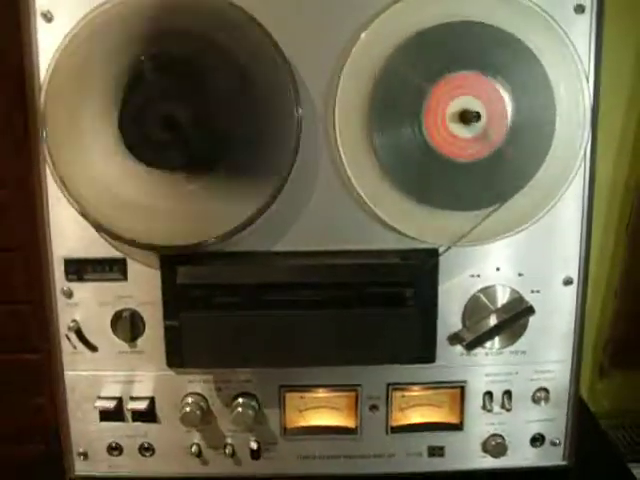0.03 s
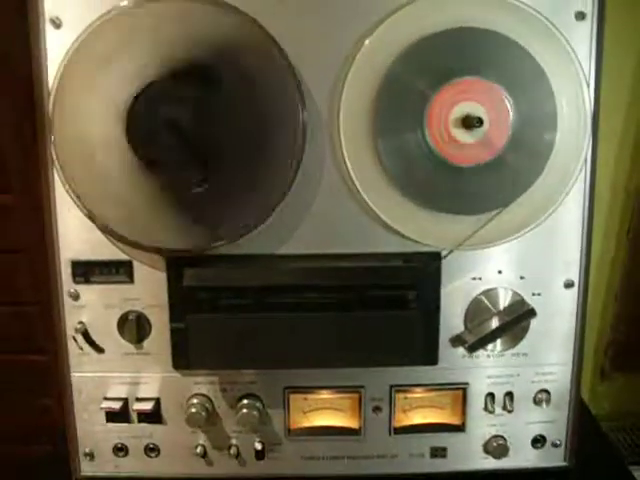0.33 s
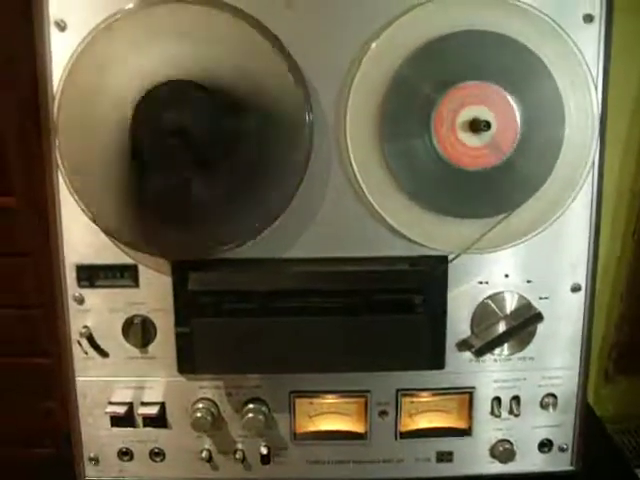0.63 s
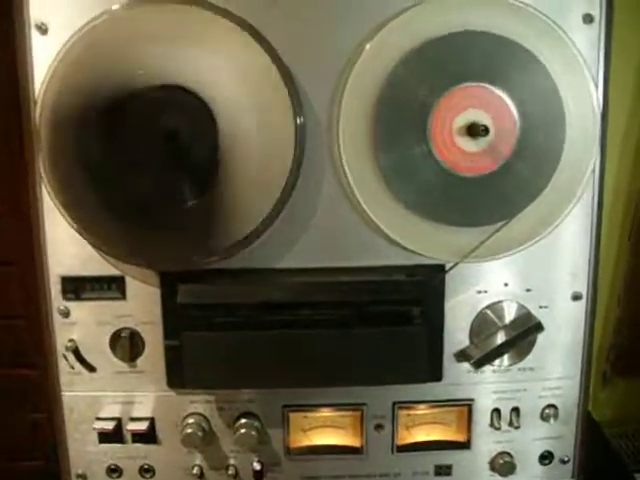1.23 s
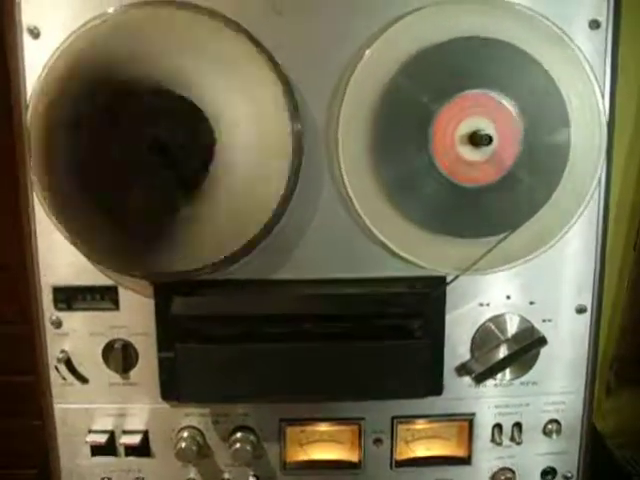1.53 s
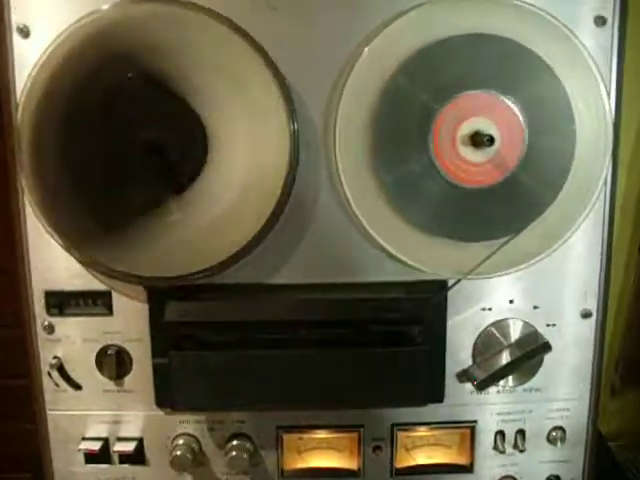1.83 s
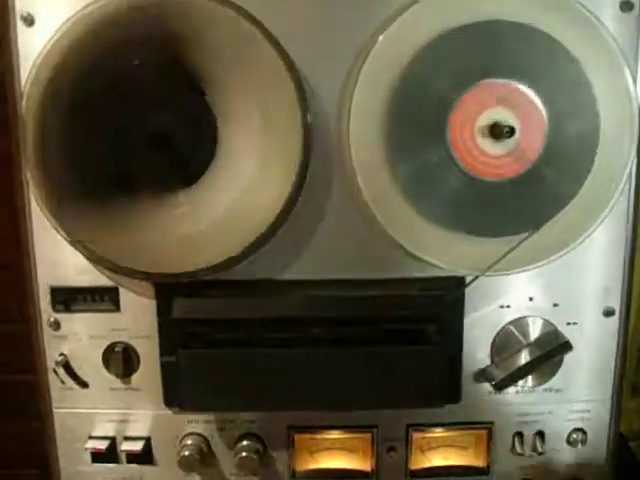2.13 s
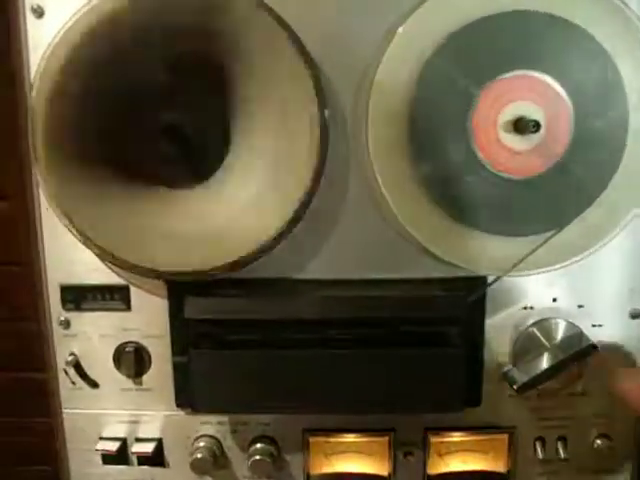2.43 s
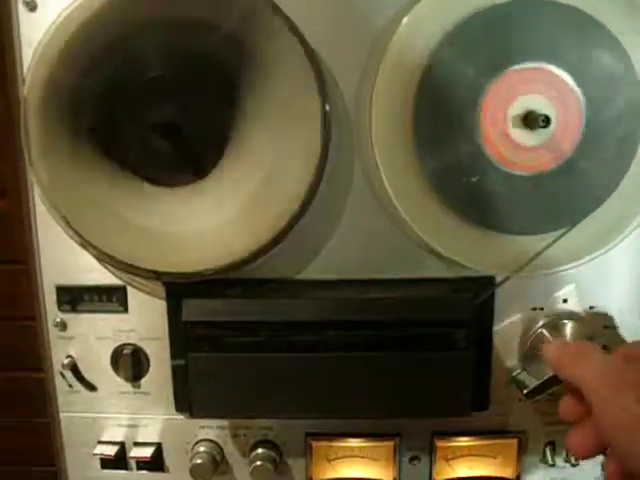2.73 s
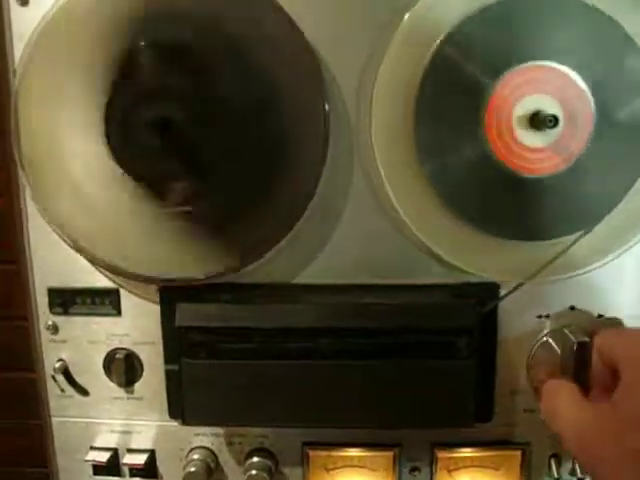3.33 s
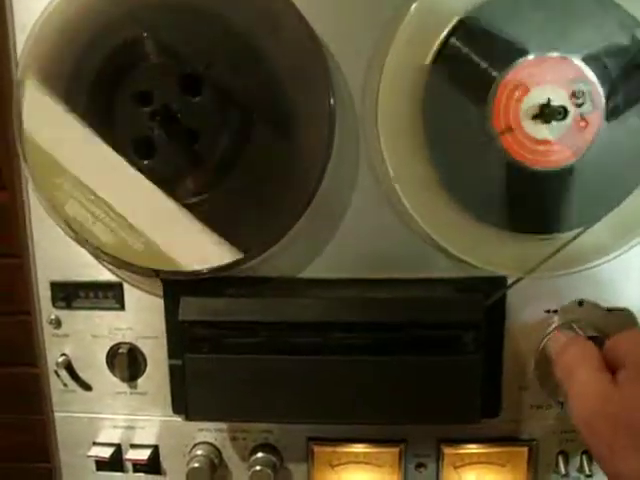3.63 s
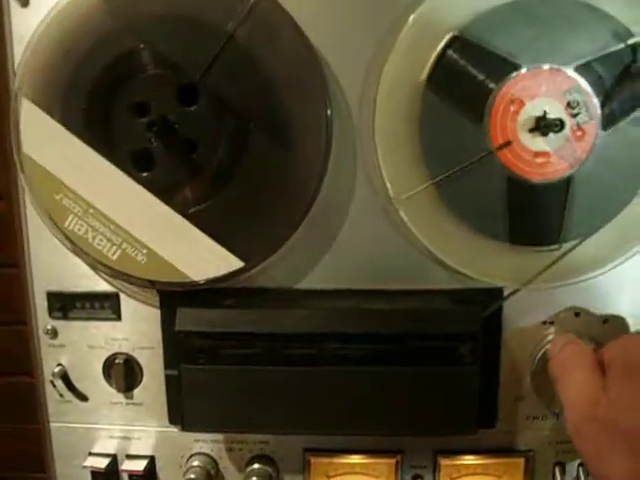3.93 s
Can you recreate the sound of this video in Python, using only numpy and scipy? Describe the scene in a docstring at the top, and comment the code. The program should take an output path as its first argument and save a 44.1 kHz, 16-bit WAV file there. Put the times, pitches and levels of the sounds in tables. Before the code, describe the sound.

A tape machine whirs and hisses indoors, its spinning reels ticking softly and the tape brushing a rim. Then levers and brakes slam over in a sharp metallic clunk, briefly overloading the microphone, and the reels run down.

```python
"""A small room, where a reel-to-reel tape machine winds fast: motors whir, tape hisses and brushes a
reel's flange, and a turning part knocks softly on every turn. A hand turns the transport knob: levers
and brakes slam over in one rattling clunk that rings the deck's panels, thuds through the cabinet
and overloads the microphone. The latch snaps home, and the motor tones fade as the reels run down."""
import sys
import numpy as np
from scipy import signal
from scipy.io import wavfile

SR = 44100
rng = np.random.default_rng(int(sys.argv[2]) if len(sys.argv) > 2 else 0)


def wrap_up_sound(samples):
    """Save the sound to the file named by the first command line argument, as 16-bit audio."""
    columns = np.atleast_2d(samples).T
    # keep every value between -1 and 1, then stretch to whole-number steps
    tamed = np.clip(columns, -1, 1)
    steps = np.round(tamed * 32767).astype(np.int16)
    wavfile.write(sys.argv[1], SR, steps)


N = 176400
T = np.arange(N) / SR


def from_db(db):
    """Decibels to gain."""
    return 10 ** (np.asarray(db) / 20)


def rms_one(x):
    """Scale to unit rms."""
    return x / np.sqrt(np.mean(x ** 2) + 1e-20)


def at_hz(points, hz):
    """Read a table on a log-frequency axis."""
    freqs, values = np.transpose(points)
    return np.interp(np.log(hz), np.log(freqs), values)


def clicks(times, gains):
    """One impulse at each time."""
    return np.bincount(np.clip(times * SR, 0, N - 1).astype(int), gains, N) + 1e-18


def ring(x, hz, t60):
    """A resonance: a unit click sets off a dying sine of height 1."""
    radius, angle = from_db(-60 / (t60 * SR)), 2 * np.pi * hz / SR
    return signal.lfilter([.5, 0, -.5], [1, -2 * radius * np.cos(angle), radius * radius], x)


def struck(x, hz, t60, swell_s):
    """A mode that takes a moment to ring up."""
    return ring(x, hz, t60) - ring(x, hz, swell_s * np.log(1000))


def dying(power, attack_s, t60):
    """Power envelope that rises and dies away after each impulse."""
    decay, attack = 10 ** (-6 / (t60 * SR)), np.exp(-1 / (attack_s * SR))
    tails = signal.lfilter([1], [1, -decay], power)
    return signal.lfilter([1 - attack], [1, -attack], tails)


def noise_bands(spectrum):
    """Third-octave noises as (centre in Hz, signal), their powers adding up to 1."""
    edges = 20 * 2 ** (np.arange(28) / 3)
    centres = np.sqrt(edges[1:] * edges[:-1])
    white = rng.standard_normal((3, N))
    gains = from_db(at_hz(spectrum, centres)) * np.sqrt(np.diff(edges))
    for k, gain in enumerate(gains / np.linalg.norm(gains)):
        sos = signal.butter(2, edges[k:k + 2], "band", fs=SR, output="sos")
        yield centres[k], gain * rms_one(signal.sosfilt(sos, white[k % len(white)]))


def drift(count):
    """A slow wander through count random points, spread about 1."""
    return np.interp(T, np.linspace(0, T[-1], count), rng.standard_normal(count))


def low_pass(x, hz):
    """Steep low-pass."""
    return signal.sosfilt(signal.ellip(12, .1, 90, hz, fs=SR, output="sos"), x)


def whir(level_db=-45, flicker_db=0.66):
    """A bed of air noise and tape hiss, each band flickering slightly on its own."""
    # colour of the bed: f/Hz, relative density/dB
    spectrum = [(25, 1.5), (90, 1.5), (165, -2), (240, 0.5), (360, 0.5), (590, 1.5), (715, -2), (870, 0.5),
                (1350, -4), (1800, -4), (2600, -7), (4500, -9), (7200, -10.5), (9000, -19.5)]
    # fader ride on the bed: t/s, gain/dB
    ride = [(0, -0.62), (3.15, 0), (3.6, -0.5), (4, -1.5)]
    air = sum(band * from_db(flicker_db * drift(count=90)) for _, band in noise_bands(spectrum))
    return air * from_db(level_db + np.interp(T, *np.transpose(ride)))


def motors(brake_s=3.4, run_down_s=1):
    """Wavering motor tones, made of narrow noise, that fade once the brakes are on."""
    # motor tones while winding: f/Hz, width/Hz, level/dB
    tones = [(205, 7, -63), (229, 20, -60.5), (265.8, 7, -58), (298.4, 5.8, -62.5), (446.4, 5, -60),
             (838.5, 12, -67.5)]
    hum = 0
    for hz, width, db in tones:
        t60 = np.log(1000) / (np.pi * width)
        hum += from_db(db) * rms_one(ring(rng.standard_normal(N), hz, t60))
    return hum * np.exp(-np.maximum(T - brake_s, 0) / run_down_s)


def tape_brushes(width_s=0.0049, band_hz=(710, 6000)):
    """Short swishes of tape against the reel's flange, with a faint ring in them."""
    # the tape touches the flange: t/s, level/dB
    touches = [(1.095, -48), (1.71, -48), (2.01, -52), (2.425, -51), (2.527, -47), (2.627, -49.5),
               (2.729, -49), (2.833, -46), (2.928, -46.5), (3.025, -47.5), (3.125, -48)]
    band = signal.butter(1, band_hz, "band", fs=SR, output="sos")
    hiss = signal.sosfilt(band, rng.standard_normal(N))
    ringing = from_db(-24) * ring(hiss, hz=3500, t60=0.0094)
    swells = sum(from_db(db) * np.exp(-.5 * ((T - s) / width_s) ** 2) for s, db in touches)
    return rms_one(hiss + ringing) * swells


def knocks(trim_db=-2, spread_db=3, swell_s=0.00159, jitter_s=0.00053, echo_s=0.011, echo_db=-12.5):
    """A turning part rings up the cabinet: a soft knock and its reflection each turn, until the clunk."""
    # one knock a turn: t/s, relative level/dB
    turns = [(0.009, -39.5), (0.104, -40), (0.197, -42), (0.292, -38), (0.386, -42), (0.481, -37),
             (0.574, -37), (0.667, -45), (0.762, -41), (0.859, -36), (0.951, -36.5), (1.044, -38),
             (1.14, -36), (1.233, -34.5), (1.326, -41), (1.421, -42), (1.515, -39), (1.608, -38.5),
             (1.702, -39.5), (1.796, -38), (1.891, -36), (1.984, -43), (2.079, -36.5), (2.172, -41),
             (2.267, -39), (2.361, -39.5), (2.454, -40), (2.55, -38), (2.643, -38), (2.736, -43),
             (2.831, -35.5), (2.926, -39), (3.021, -36.5), (3.114, -41)]
    # the knock's hollow body: f/Hz, gain/dB, t60/s
    modes = [(855, -1, 0.06), (1000, 1.5, 0.04), (1129, -1.5, 0.046), (1780, -12.5, .04)]
    times, turn_db = np.transpose(turns)
    out = 0
    for hz, mode_db, t60 in modes:
        gains = from_db(turn_db + trim_db + mode_db + spread_db * rng.standard_normal(len(times)))
        onsets = times - swell_s + rng.normal(0, jitter_s, len(times))
        taps = clicks(onsets, gains) + clicks(onsets + echo_s, gains * from_db(echo_db))
        out += struck(taps, hz, t60, swell_s)
    return out


def brake_thud(at_s=3.23, level_db=-21):
    """The brake's blow, the heaviest of the clunk, shakes the cabinet."""
    return ring(clicks(np.array([at_s]), from_db([level_db])), hz=149, t60=0.1)


def linkage_rattle(times, blow_db, treble_db, bass_db):
    """Each blow rattles the linkage: a burst of noise that dies away in the room."""
    # colour of a blow: f/Hz, relative density/dB
    spectrum = [(30, -36), (100, -23), (160, -20), (300, -19), (430, -2.5), (550, -2.5), (900, 0.5),
                (1600, -6.5), (2300, -6.5), (4500, -12.5), (6300, -8), (8000, -14.5)]
    # the room's decay: f/Hz, t60/s
    room_decay = [(100, 0.63), (500, 0.48), (1250, 0.3837), (2500, 0.65), (7000, 0.17)]
    # the room's reverb send: f/Hz, gain/dB
    room_send = [(100, -15), (250, -5.5), (800, -19), (1300, -9.5), (2500, -20), (7000, -17.5)]
    out = 0
    for hz, band in noise_bands(spectrum):
        octaves = np.log2(hz / 1000)
        tilt_db = treble_db * np.clip(octaves / 2, 0, 1) + bass_db * np.clip(-octaves, 0, 1)
        power = clicks(times, from_db(blow_db + tilt_db) ** 2)
        stretch = 2 ** (-0.29 * octaves)  # lower bands ring longer
        direct = dying(power, attack_s=0.0012 * stretch, t60=0.067 * stretch)
        room = dying(power, attack_s=0.015, t60=at_hz(room_decay, hz))
        send = from_db(at_hz(room_send, hz))
        out += band * np.sqrt(direct + room * send ** 2)
    return out


def clunk():
    """Levers, brakes and latch strike the deck: each blow rattles and sets the metal ringing."""
    # blows on the deck: t/s, relative level/dB, treble/dB, bass/dB, latch ring/dB
    blows = [(3.1881, -22.5, 5, 8, -20), (3.1921, -15, 7.5, 1.5, -23), (3.202, -11, 0.5, 0.5, -8),
             (3.2071, -14.5, 2, -1, 3), (3.2144, -17, -9, -3, 3), (3.2189, -17.5, -1.5, -16, 4),
             (3.2268, -6.5, 1.5, -12, -8), (3.23, 0.5, -6.5, -10, -16), (3.2352, -4, 2.5, 2.5, -12),
             (3.246, -18, 4.5, 1, -6), (3.2566, -15, -2, -7, 1.5), (3.2738, -9, 2, 4, -8),
             (3.28, -15.5, 3, 0, 2), (3.2958, -15, 2.5, 0, 7), (3.3313, -26.5, 9.5, 12, -17),
             (3.3637, -13.5, 4, 1, 8.5), (3.487, -32, -2.5, -5, -8), (3.506, -38, 1.5, 2, 6),
             (3.702, -39.5, -5, -5, -5), (3.986, -39.5, -2, 5, -4)]
    # long ring of the deck's panels: f/Hz, gain/dB, t60/s
    panel_modes = [(222.7, -31.5, 0.58), (253.7, -31, 0.36), (281.5, -33.5, 0.35), (462, -23.5, .42),
                   (674, -24, 0.26), (755, -24, 0.25), (860, -22, 0.24), (918, -21, 0.22),
                   (1005, -26, 0.19), (1180, -29, 0.59), (1240, -23, .5), (1242, -25, 0.67),
                   (1392, -26, .55), (1490, -27.5, 0.4), (1500, -23, 0.33), (1597, -20.5, 0.24),
                   (1765, -16, 0.2), (1809, -23, 0.26), (2514, -35.5, 0.93), (2665, -29, 0.63)]
    # short snap of the latch: f/Hz, gain/dB, t60/s
    latch_modes = [(1258, -2.5, 0.034), (1363, 3.5, 0.03), (1536, -3.5, 0.041)]
    times, blow_db, treble_db, bass_db, latch_db = np.transpose(blows)
    out = linkage_rattle(times, blow_db, treble_db, bass_db)
    for modes, strength_db in ((panel_modes, blow_db), (latch_modes, blow_db + latch_db)):
        for hz, mode_db, t60 in modes:
            hits = clicks(times, from_db(strength_db + mode_db))
            out += struck(hits, hz, t60, swell_s=0.00064)
    return out


def scene():
    """The winding machine and the clunk that stops it, in mono."""
    return (whir() + motors() + knocks() + tape_brushes() + brake_thud() + clunk())[None]


def record(dry):
    """A narrow-band microphone that overloads on the clunk; the top is cut."""
    band_hz, leak_db, top_hz, cutoff_hz = 7670, -12, 8700, 15850
    ceiling, knee = 0.72, 8
    narrow = low_pass(dry, band_hz)
    skirt = signal.sosfilt(signal.butter(8, band_hz, "high", fs=SR, output="sos"), dry)
    mic = low_pass(narrow + from_db(leak_db) * skirt, top_hz)
    clipped = mic / (1 + np.abs(mic / ceiling) ** knee) ** (1 / knee)
    top_cut = signal.firwin(301, cutoff_hz, fs=SR, window="blackman")
    return signal.fftconvolve(clipped, top_cut[None], "same")


dry = scene()
out = record(dry)
wrap_up_sound(out)
```